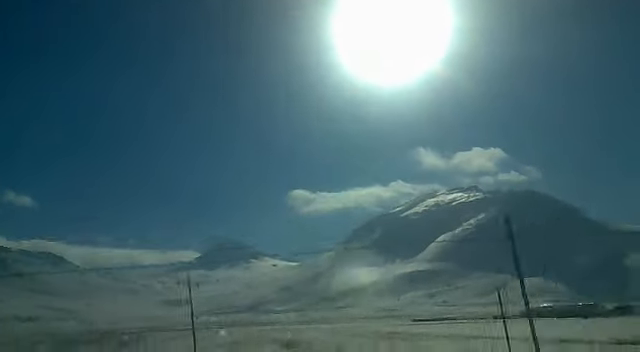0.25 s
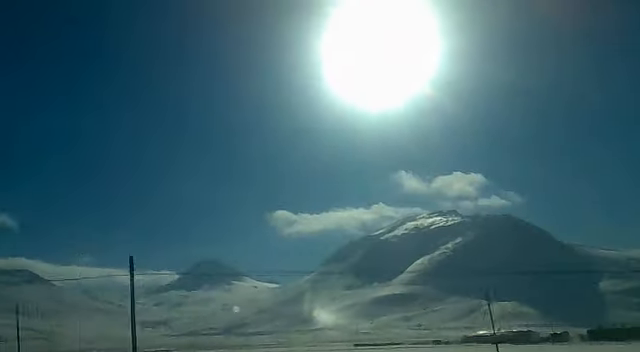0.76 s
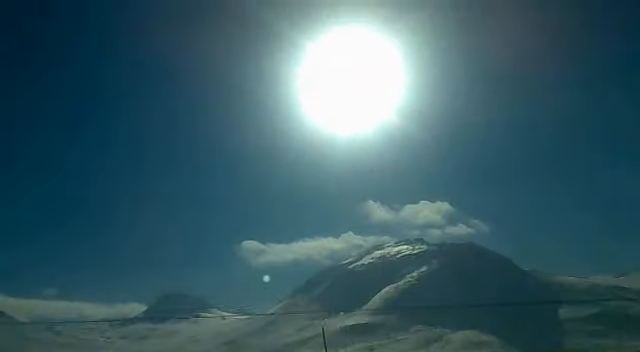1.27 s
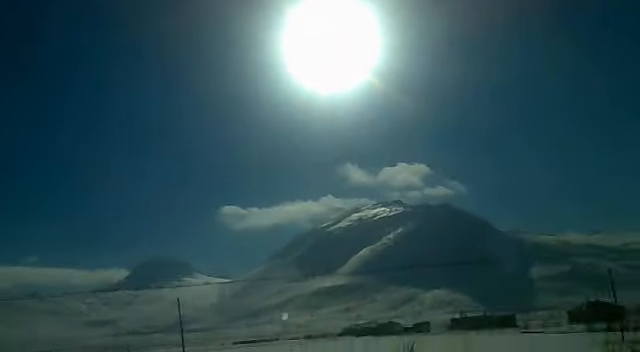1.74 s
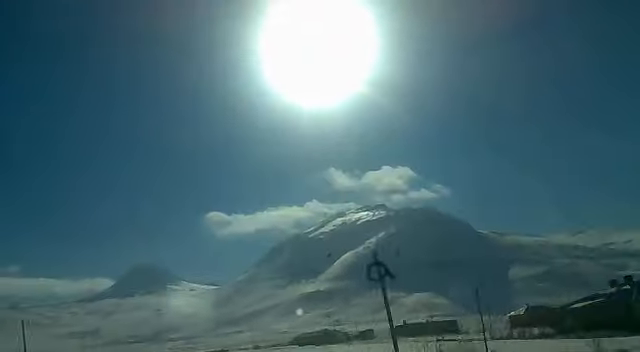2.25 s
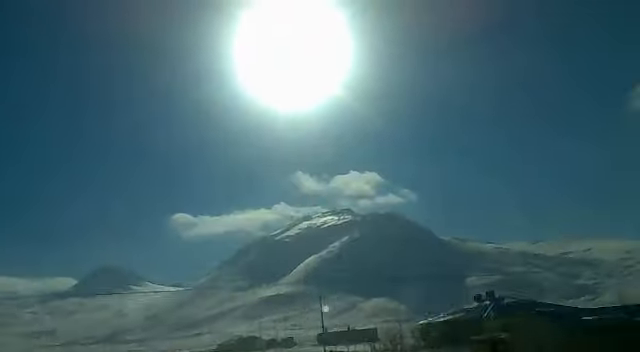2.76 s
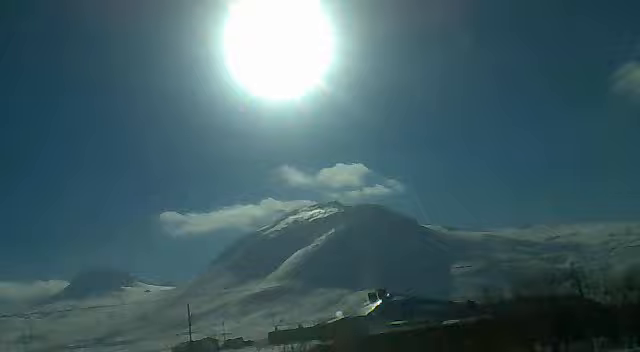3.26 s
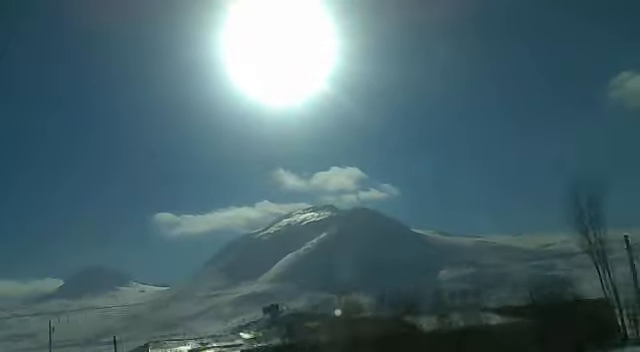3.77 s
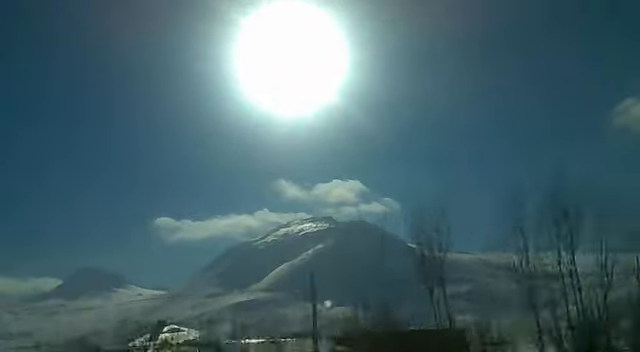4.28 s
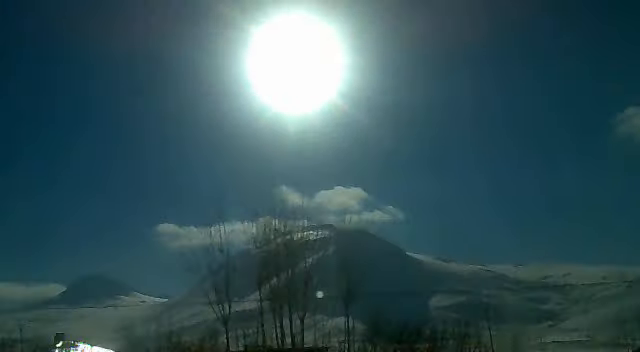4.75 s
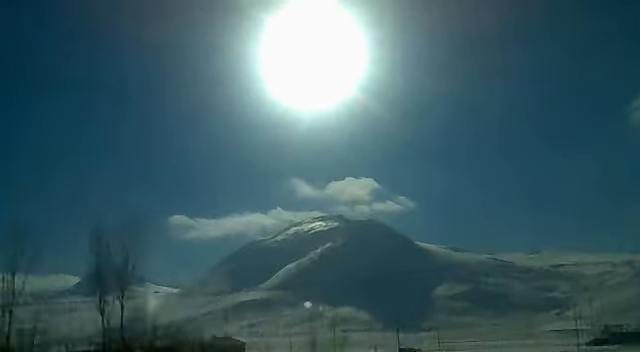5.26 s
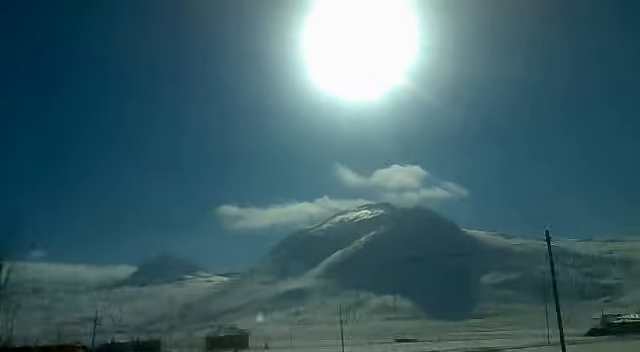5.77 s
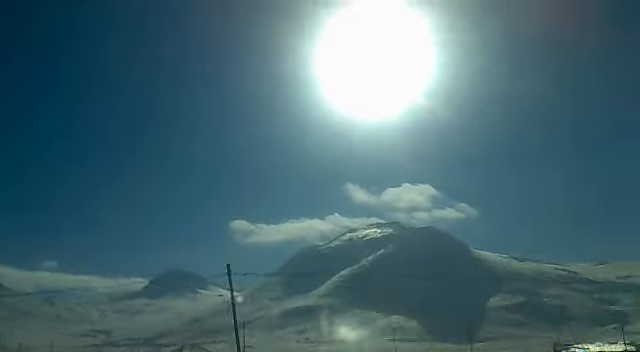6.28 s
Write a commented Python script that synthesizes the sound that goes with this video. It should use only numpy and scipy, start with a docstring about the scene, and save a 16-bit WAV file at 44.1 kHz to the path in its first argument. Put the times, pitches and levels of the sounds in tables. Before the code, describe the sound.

Inside a moving diesel train, steady low rumble and engine hum with faint knocking, then a burst of heavy thuds and roar near the end.

```python
"""Inside a heavy diesel train

The cabin of a heavy diesel train rolling steadily. Wheel noise is random noise coloured by the cabin's
resonances; diesel, drive and fan hum as sums of sines, and the diesel's knocks ring panels.
Trim ticks in short bursts of noise and squeaks in gliding, raspy tones early on. Near the end the wheels
thud over a rough patch as decaying sines, while the running gear roars and the body shudders."""
import sys
import numpy as np
from scipy import signal
from scipy.fft import rfft, irfft
from scipy.io import wavfile

SR = 44100
rng = np.random.default_rng(int(sys.argv[2]) if len(sys.argv) > 2 else 0)


def waveform_to_disk(signal):
    """Save audio, clipped to [-1, 1], as 16-bit WAV at the path in sys.argv[1]."""
    frames = np.transpose(np.atleast_2d(signal))
    scaled = np.clip(frames, -1, 1) * 32767
    samples = np.round(scaled).astype(np.int16)
    wavfile.write(sys.argv[1], SR, samples)


N = 287532
TIME = np.arange(N) / SR  # seconds

# Basic colour of the rolling noise. Each row: frequency in Hz, level in dB per Hz.
ROLLING_COLOUR = [(10, -88), (20, -65), (60, -74.5), (140, -79), (290, -75.5), (400, -81.5), (620, -84.5),
                  (1000, -90), (1350, -90.5), (2000, -95), (2500, -101.3), (4600, -109.9), (9500, -111.8),
                  (15500, -109.6)]
# Cabin and panel resonances on top of it. Each row: centre in Hz, width in Hz, lift in dB.
CABIN_RESONANCES = [(93.4, 38, 7), (216.7, 2.6, 4), (715, 38, 5), (854, 118, 6), (1000, 92, 9),
                    (1230, 71, 3.5), (1450, 21, 3), (1530, 37, 7.5), (1634, 26, 5.5), (1763, 74, 5),
                    (1895, 100, 6), (2854, 93, 4.5), (3250, 510, 9)]
# Stretches of rough track. Each row: start in seconds, length in seconds, rise of the roughness in dB.
ROUGH_STRETCHES = [(0.0, 0.82, 1.6), (1.428, 0.32, 3), (5.405, 0.69, 13.4)]
BUILD_SHARE, FADE_SHARE = 0.42, 0.34  # shares of a stretch's length

# Cycle rates of the machines.
DIESEL_HZ, DRIVE_HZ, FAN_HZ = 12.438, 16.329, 41.14
# Hum of the diesel. Each row: multiple of its cycle rate, level in dB rms.
DIESEL_ORDERS = [(3, -56), (7, -57.5), (8, -61.5), (9, -67.5), (18, -60), (19, -72.5), (20, -74),
                 (22, -62.5), (23, -72.5), (41, -72), (42, -72.5), (43, -58.5), (44, -70.5), (71, -72),
                 (72, -72), (87, -77), (92, -85.5), (94, -77.5), (103, -77), (167, -76.5)]
# Hum of the drive. Each row: multiple of its cycle rate, level in dB rms.
DRIVE_ORDERS = [(4, -52), (8, -70.5), (12, -59.5), (13, -62.5), (14, -52), (16, -69.5), (19, -63.5),
                (24, -69)]
# Hum of the fan. Each row: multiple of its cycle rate, level in dB rms.
FAN_ORDERS = [(1, -59), (4, -67), (12, -77.5), (14, -75)]
# One knock a cylinder. Each row: place in the engine cycle from 0 to 1, relative level in dB.
CYLINDER_KNOCKS = [(.0, -6), (.285, -10), (.425, -8), (.555, -7), (.64, 0), (.82, -6)]
# Panels rung by the knocks. Each row: centre in Hz, width of one stage in Hz, relative level in dB.
PANEL_MODES = [(907, 86, -2.5), (1001.4, 95, 2), (1025, 28, -4.5), (1155, 66, -21), (1950, 620, -17.5)]

# Resonances of the running gear. Each row: centre in Hz, width of one stage in Hz, relative level in dB.
RUNNING_GEAR_MODES = [(99, 31, 1.5), (168, 49, 4), (263.6, 76, 1.5), (386, 68, -1.5), (564, 101, -3.5),
                      (680, 74, -3), (820, 177, 0.5), (1507, 390, -9.5)]
# Wheels grinding over the rough patch. Each row: start in seconds, length before the fade in seconds,
# level in dB rms.
WHEEL_GRINDS = [(5.587, 0.034, -34), (5.632, 0.038, -33), (5.691, 0.035, -30.5)]
GRIND_ATTACK_S, GRIND_T60_S = 0.016, 0.11
# Blows through the suspension. Each row: start in seconds, peak level in dB before the attack softens it,
# frequency in Hz, 60 dB decay time in seconds.
SUSPENSION_THUDS = [(5.506, -30, 75, 0.12), (5.601, -23, 79, 0.078), (5.689, -28, 60.6, 0.061),
                    (5.844, -22.5, 35, 0.21), (6.176, -30.5, 64.81, 0.053)]

# Loose trim ticking. Each row: start in seconds, initial level in dB rms, centre in Hz,
# 60 dB decay time in seconds.
TRIM_TICKS = [(0.238, -54, 1900, 0.019), (0.363, -64, 8000, .06), (1.563, -45, 2400, 0.01),
              (5.451, -47, 1700, 0.033), (5.507, -44, 700, 0.029), (5.542, -44, 950, 0.025),
              (5.694, -53, 5000, 0.035), (5.768, -38, 1000, 0.038), (6.188, -59, 3800, 0.02)]
# Trim squeaking. Each row: start in seconds, level in dB rms, start pitch in Hz, end pitch in Hz,
# length in seconds.
TRIM_SQUEAKS = [(.143, -61, 2920, 3120, .034), (.14, -72, 6150, 6050, .075), (.16, -68, 8200, 8700, .06),
                (.538, -71, 6750, 6300, .058)]


def amp(db):
    """Decibels to gain."""
    return 10 ** (np.asarray(db) / 20)


def unit(x):
    """Scales to rms 1."""
    return x / np.sqrt(np.mean(x ** 2) + 1e-20)


def add(mix, start_s, sound):
    """Mixes a sound in at start_s seconds."""
    part = mix[max(round(start_s * SR), 0):][:len(sound)]
    part += sound[:len(part)]


def drift(rate_hz, size=N):
    """Random motion of rms 1, smoothed to fade out around rate_hz; size cuts it short."""
    hz = np.fft.rfftfreq(N, 1 / SR)
    smoothed = rfft(rng.standard_normal(N)) * np.exp(-(hz / rate_hz) ** 2)
    return unit(irfft(smoothed, N))[:size]


def ring(x, modes):
    """Passes x through steep two-stage resonances, each at its own level; the sum has rms 1."""
    hz, spectrum = np.fft.rfftfreq(len(x), 1 / SR), rfft(x)
    out = np.zeros(len(x))
    for centre_hz, width_hz, db in modes:
        detuning = (hz - centre_hz ** 2 / (hz + 1e-3)) / width_hz
        out += amp(db) * unit(irfft(spectrum / (1 + 1j * detuning) ** 2, len(x)))
    return unit(out)


def roughness():
    """Rise of the track's roughness in dB: every stretch builds up, holds and fades."""
    rise_db = np.zeros(N)
    for start_s, length_s, db in ROUGH_STRETCHES:
        way = (TIME - start_s) / length_s
        rise_db += db * np.clip(np.minimum(way / BUILD_SHARE, (1 - way) / FADE_SHARE), 0, 1)
    return rise_db


def rolling(smooth_db=-1.0, flutter_db=1.0, bass_share=0.91, roar_share=0.57, treble_share=0.44):
    """Wheel noise coloured by the cabin; it swells on rough track, most in the bass."""
    hz = np.fft.rfftfreq(N, 1 / SR) + 1e-3
    points, level = np.transpose(ROLLING_COLOUR)
    colour_db = np.interp(np.log(hz), np.log(points), level)
    for centre_hz, width_hz, db in CABIN_RESONANCES:
        colour_db += db / (1 + (2 * (hz - centre_hz) / width_hz) ** 2)
    # the root turns dB per Hz into the level of white noise
    spectrum = rfft(rng.standard_normal(N)) * amp(colour_db) * np.sqrt(SR / 2)
    edges = [0, 130, 450, 1100, 2200, 4200, SR]  # Hz
    bands = [irfft(spectrum * (hz >= lo) * (hz < hi), N) for lo, hi in zip(edges, edges[1:])]
    bass, *middle, hiss = bands
    # each band of the roar flutters a little by itself
    roar = sum(band * amp(flutter_db * drift(12.4)) for band in middle)
    # each range follows its own share of the track's dB
    rough_db = smooth_db + roughness()
    out = bass * amp(bass_share * rough_db)
    out += roar * amp(roar_share * rough_db)
    return out + hiss * amp(treble_share * rough_db)


def turns_of(cycle_hz, wander):
    """Cycles done by a governed machine whose speed wanders by a small rms share."""
    return np.cumsum(cycle_hz * (1 + wander * drift(2.5))) / SR


def hum(turns, orders, waver_db):
    """Sines locked to multiples of one machine's cycle, each wavering a little in level."""
    out = np.zeros(N)
    for multiple, db in orders:
        level = amp(db + waver_db * drift(2.5))
        out += level * np.cos(2 * np.pi * (multiple * turns + rng.random()))
    return np.sqrt(2) * out  # rms to peak


def knock(turns, level_db=-58.5, uneven_db=2.0, rattle=0.29):
    """Six unequal cylinders strike the panels once each a cycle; a brief rattle follows each blow."""
    blows = np.zeros(N)
    for place, db in CYLINDER_KNOCKS:
        at = np.flatnonzero(np.diff(np.floor(turns - place)))
        blows[at] += amp(db + uneven_db * rng.standard_normal(len(at)))
    decay = np.exp(-TIME[:SR // 20] / 0.0028)  # seconds
    loose = signal.oaconvolve(blows, decay)[:N] * rng.standard_normal(N)
    return amp(level_db) * ring(unit(blows) + rattle * unit(loose), PANEL_MODES)


def grinding():
    """Force on the running gear: each grind rises quickly, holds and fades away."""
    force = np.zeros(N)
    for start_s, length_s, db in WHEEL_GRINDS:
        attack = np.clip((TIME - start_s) / GRIND_ATTACK_S, 0, 1)
        fading_s = np.maximum(TIME - start_s - length_s, 0)
        force += attack * amp(db - 60 * fading_s / GRIND_T60_S)
    return force


def rough_patch(grain_db=3.0, body_hz=16, body_width_hz=10, gear_db=-53.0, shudder_db=-45.5):
    """Grainy noise rings the running gear, a low resonance shudders the body, and damped sines thud."""
    jolt = amp(roughness()) - 1  # shaking beyond that of smooth track
    force = np.hypot(grinding(), amp(gear_db) * jolt)
    grainy = rng.standard_normal(N) * amp(grain_db * drift(150))
    out = force * ring(grainy, RUNNING_GEAR_MODES)
    shudder = ring(rng.standard_normal(N), [(body_hz, body_width_hz, 0)])
    out += amp(shudder_db) * jolt * shudder
    t = TIME[:SR // 2]
    attack = 1 - np.exp(-t / 0.0022)
    for start_s, db, hz, t60 in SUSPENSION_THUDS:
        add(out, start_s, amp(db - 60 * t / t60) * np.sin(2 * np.pi * hz * t) * attack)
    return out


def scuff(size, hz):
    """Broad contact noise of rms 1, from an octave below hz to an octave above where there is room."""
    edges = [hz / 2, min(hz * 2, SR / 2 - 100)]
    band = signal.butter(2, edges, "bandpass", fs=SR, output="sos")
    return unit(signal.sosfilt(band, rng.standard_normal(size)))


def trim(rasp=0.032, rub_share=0.31):
    """Loose fittings tick as decaying noise, and rub in short raspy squeaks."""
    out, t = np.zeros(N), TIME[:SR // 5]
    for start_s, db, hz, t60 in TRIM_TICKS:
        add(out, start_s, amp(db - 60 * t / t60) * scuff(len(t), hz))
    for start_s, db, start_hz, end_hz, length_s in TRIM_SQUEAKS:
        size = int(length_s * SR)
        # uneven slipping makes the pitch jitter
        hz = np.linspace(start_hz, end_hz, size) * (1 + rasp * drift(760, size=size))
        tone = np.sin(2 * np.pi * np.cumsum(hz) / SR)
        slip = tone + rub_share * scuff(size, start_hz)
        add(out, start_s, amp(db) * unit(slip * signal.windows.tukey(size, .8)))
    return out


def scene():
    """Everything heard in the cabin, as one channel."""
    wheels = rolling()
    diesel = turns_of(DIESEL_HZ, wander=0.00029)
    # hum and knock share the diesel's cycle
    machines = hum(diesel, DIESEL_ORDERS, waver_db=1.5) + knock(diesel)
    machines += hum(turns_of(DRIVE_HZ, wander=0.0006), DRIVE_ORDERS, waver_db=0.5)
    machines += hum(turns_of(FAN_HZ, wander=0.00013), FAN_ORDERS, waver_db=0.5)
    return (wheels + machines + rough_patch() + trim())[None]


def record(dry, edge_hz=15800):
    """The recorder's band limit: a steep low-pass."""
    low_pass = signal.firwin(511, edge_hz, window=("kaiser", 9), fs=SR)
    return signal.oaconvolve(dry, low_pass[None], "same")


dry = scene()
out = record(dry)
waveform_to_disk(out)
```